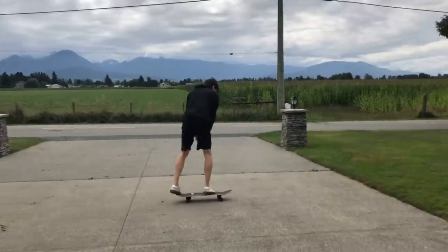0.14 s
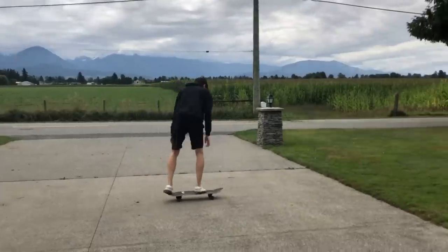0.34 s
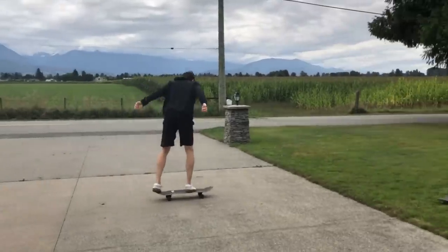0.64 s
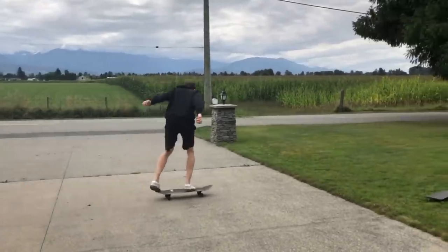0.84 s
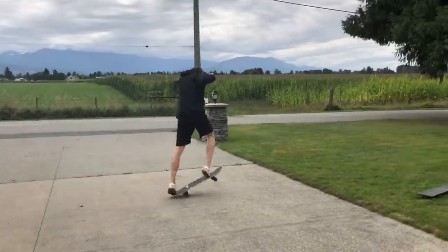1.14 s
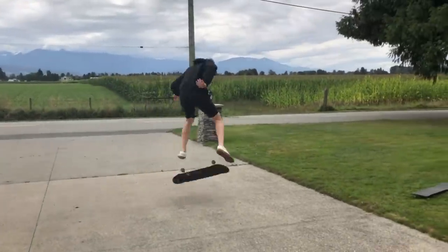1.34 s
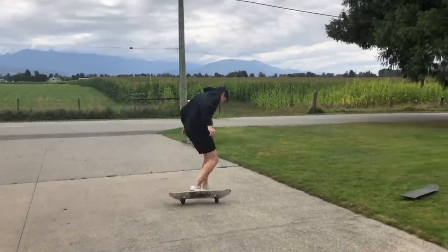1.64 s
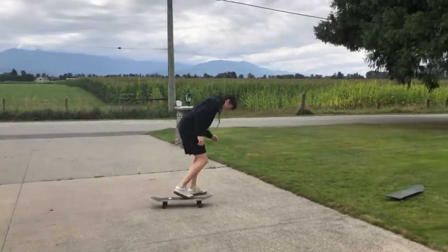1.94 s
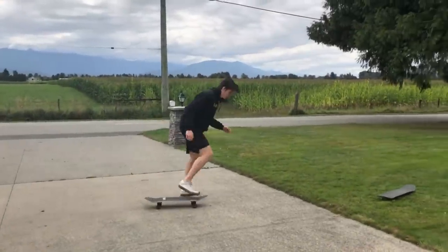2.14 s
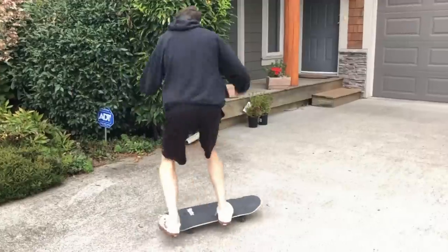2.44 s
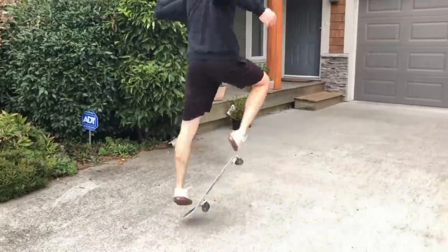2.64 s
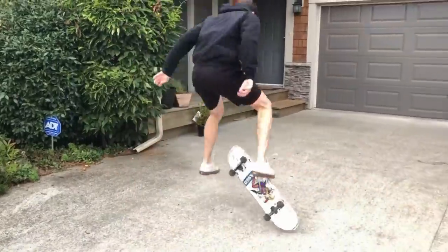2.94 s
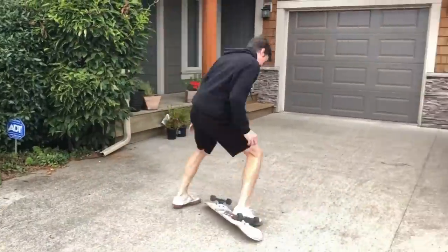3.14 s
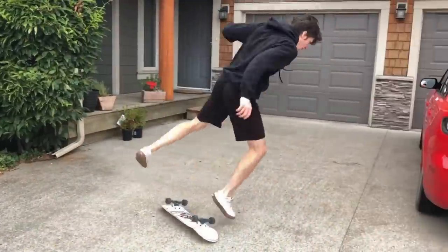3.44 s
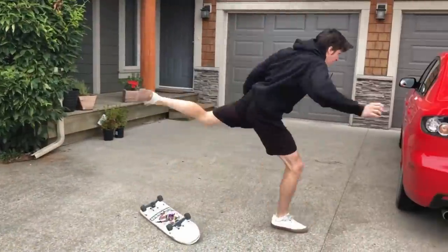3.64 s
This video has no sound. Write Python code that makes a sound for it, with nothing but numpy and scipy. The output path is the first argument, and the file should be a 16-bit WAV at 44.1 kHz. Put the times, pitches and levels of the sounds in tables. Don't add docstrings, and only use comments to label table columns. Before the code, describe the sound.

A distant skateboard hums quietly over gritty concrete with small stone ticks, pops at 1.2 s, and slams down in hard wooden clacks from 1.5 to 1.7 s, with a lighter knock near 1.95. At 2.3 s a closer, louder board rolls, pops sharply at 2.64, then crashes from 2.95 in rapid loud knocks with a short skid squeak at 3.13. Metal ticks and faint steps fade into quiet open air.

```python
import sys
import numpy as np
from scipy import signal
from scipy.fft import rfft, irfft
from scipy.io import wavfile

SR = 44100
rng = np.random.default_rng(int(sys.argv[2]) if len(sys.argv) > 2 else 0)


def wav_out(sig):
    wavfile.write(sys.argv[1], SR, np.round(np.clip(np.atleast_2d(sig).T, -1, 1) * 32767).astype(np.int16))


def ratio_of_db(decibels):
    return 10 ** (np.asarray(decibels, float) / 20)


N = 167580
TIME = np.arange(N) / SR


def rms_one(x):
    return x / np.sqrt(np.mean(x ** 2) + 1e-20)


def gains(rows):
    s, db, extra_db = np.transpose(rows)
    edge_s = 0.006
    inside = np.clip(np.minimum(TIME - s[0], s[-1] - TIME) / edge_s + 1, 0, 1)
    return inside * ratio_of_db(np.interp(TIME, s, db)), ratio_of_db(np.interp(TIME, s, extra_db))


def colour(x, points):
    hz, db = np.transpose(points)
    f = np.maximum(np.arange(N // 2 + 1) * SR / N, 1)
    octaves_below = np.maximum(np.log2(hz[0] / f), 0)
    octaves_above = np.maximum(np.log2(f / hz[-1]), 0)
    shape_db = np.interp(np.log(f), np.log(hz), db) - 18 * (octaves_below + octaves_above)
    return rms_one(irfft(rfft(x) * ratio_of_db(shape_db), N))


def ring(x, hz, t60):
    r, w = ratio_of_db(-60 / (t60 * SR)), 2 * np.pi * hz / SR
    return signal.lfilter([0, np.sin(w)], [1, -2 * r * np.cos(w), r * r], x + 1e-18)


def flutter(rate, depth_db):
    knots = rng.standard_normal(4000)
    return ratio_of_db(depth_db * np.interp(TIME * rate, np.arange(4000), knots))


def grains(per_s, spread_db):
    size = ratio_of_db(spread_db * np.minimum(rng.exponential(1, N), 4)) * rng.choice([-1, 1], N)
    return size * (rng.random(N) < per_s / SR)


# frequency in Hz, density in dB.
AIR_SPECTRUM = [(100, -8.5), (150, -7.5), (600, 0.5), (2300, -5), (2800, -18), (6000, -19.5), (12000, -27),
                (16000, -43)]
AIR_DB = -60.5
TRAFFIC_HZ, TRAFFIC_DB, TRAFFIC_ENDS_S = 91, -62.5, 3.25


def air():
    hiss = colour(rng.standard_normal(N), AIR_SPECTRUM) * flutter(7, 0.87)
    fade = np.clip((TRAFFIC_ENDS_S - TIME) / 0.17, 0.25, 1)
    road = ring(ring(rng.standard_normal(N), TRAFFIC_HZ, 0.061), TRAFFIC_HZ, 0.061)
    road = rms_one(road) * flutter(15, 1.6)
    return ratio_of_db(AIR_DB) * hiss + ratio_of_db(TRAFFIC_DB) * fade * road


YARD_DB, YARD_T60_S, YARD_GAP_S = -20, 0.27, 0.0067
YARD_BAND_HZ = [305, 2200]


def yard(x):
    t = np.arange(SR) / SR
    arrival = np.clip(t / YARD_GAP_S - 0.5, 0, 1)
    tail = rng.standard_normal(SR) * ratio_of_db(-60 * t / YARD_T60_S) * arrival
    tail = signal.sosfilt(signal.butter(1, YARD_BAND_HZ, "band", fs=SR, output="sos"), tail)
    tail = tail / np.sqrt(np.sum(tail ** 2))
    return ratio_of_db(YARD_DB) * signal.fftconvolve(x, tail)[:N]


# time in seconds, pitch in Hz, level in dB.
HUM_FAR = [(0, 622, -50.5), (.2, 650, -55.5), (.55, 640, -56), (.72, 600, -59), (.85, 615, -61.5),
           (.92, 670, -50.5), (1.012, 660, -47.5), (1.15, 680, -59)]
# time in seconds, pitch in Hz, level in dB.
HUM_AIRBORNE = [(2.76, 1201, -61), (2.84, 1150, -46.5), (2.93, 1193, -59)]
HUM_WIDTH_HZ = 22


def hum(rows, width_hz):
    s, hz, db = np.transpose(rows)
    phase = 2 * np.pi * np.cumsum(np.interp(TIME, s, hz)) / SR
    lowpass = signal.butter(1, width_hz, fs=SR, output="sos")
    a, b = signal.sosfilt(lowpass, rng.standard_normal((2, N)))
    level, _ = gains(np.c_[s, db, db])
    return level * rms_one(a * np.sin(phase) + b * np.cos(phase))


# frequency in Hz, density in dB.
GRIT_SPECTRUM = [(1760, -45.5), (3000, -2.5), (5250, -9), (6480, -4), (7150, -5), (14300, -11.5),
                 (16000, -15)]
# frequency in Hz, width in Hz, level in dB.
WHEELS = [(159, 154, 3), (290, 270, -2), (622, 144, -10.5), (1080, 210, -12), (2170, 250, -14)]
# frequency in Hz, width in Hz, level in dB.
NEAR_WHEELS = [(189, 29, 3.5), (390, 140, -0.5), (720, 830, -6), (1220, 640, -5.5), (2160, 1040, -14)]
# time in seconds, level in dB, grit over hum in dB.
ROLL_FAR = [(0, -52.5, -14.5), (.45, -51.5, -15.5), (.8, -58, -14.5), (.94, -56, -13.5),
            (1.02, -38.5, -18.5), (1.09, -48.5, -15.5), (1.215, -56, 1)]
# time in seconds, level in dB, grit over hum in dB.
ROLL_AWAY = [(1.75, -50, -10), (1.93, -60.5, -14), (2.1, -66.5, -4.5), (2.312, -43, -14.5)]
# time in seconds, level in dB, grit over hum in dB.
ROLL_NEAR = [(2.325, -37.5, -18), (2.4, -35, -14), (2.46, -29.5, -20.5), (2.56, -39, -13), (2.63, -44, -15)]
GRAINS_PER_S, GRAIN_SPREAD_DB = 3000, 3.5
PEBBLES_PER_S, PEBBLE_T60_S, PEBBLE_SPREAD_DB = 80, 0.014, 3.5


def rolling(curves, wheels, pebble_db, patchy_db):
    ground = grains(GRAINS_PER_S, GRAIN_SPREAD_DB)
    wheel_hum = 0
    for k, (hz, width_hz, db) in enumerate(wheels):
        resonance = rms_one(ring(ground, hz, 2.12 / width_hz))
        wheel_hum = wheel_hum + (-1) ** k * ratio_of_db(db) * np.sqrt(width_hz) * resonance * flutter(25.08, 1.8)
    wheel_hum = rms_one(wheel_hum)

    sand = colour(rng.standard_normal(N), GRIT_SPECTRUM)
    dull = signal.sosfilt(signal.butter(1, 6000, fs=SR, output="sos"), sand)
    fade = ratio_of_db(-60 / (PEBBLE_T60_S * SR))
    shared = np.abs(grains(PEBBLES_PER_S / 2, PEBBLE_SPREAD_DB))
    grit = 0
    for band in (dull, sand - dull):
        clicks = shared + np.abs(grains(PEBBLES_PER_S / 2, PEBBLE_SPREAD_DB))
        pebbles = signal.lfilter([1], [1, -fade], clicks)
        grit = grit + band * (flutter(31.15, patchy_db) + ratio_of_db(pebble_db) * pebbles)
    return sum(level * (wheel_hum + grit_gain * grit) for level, grit_gain in map(gains, curves))


# time in seconds, level in dB.
STONES = [(0.0596, -40), (0.1052, -41), (0.1196, -39.5), (0.1974, -53), (0.224, -37.5), (0.2387, -42),
          (0.2683, -50), (0.328, -39), (0.36, -40), (0.48, -39), (0.5307, -47), (0.6674, -43),
          (0.7534, -41), (0.7857, -43), (0.8076, -43), (0.8724, -39.5), (0.8832, -37.5), (0.9664, -38.5),
          (0.9976, -52), (1.096, -38), (1.1298, -40), (1.7944, -36), (1.8973, -38.5), (2.0915, -40.5),
          (2.174, -39), (2.392, -26), (2.446, -35), (2.4956, -27), (2.533, -29), (2.585, -25),
          (2.86, -37.5), (3.2427, -24)]
STONE_DB, STONE_T60_S, STONE_LOW_HZ = -4, 0.011, 4200


def stones():
    s, db = np.transpose(STONES)
    clicks = np.zeros(N)
    clicks[(s * SR).astype(int)] = ratio_of_db(db + STONE_DB)
    puffs = signal.lfilter([1], [1, -ratio_of_db(-60 / (STONE_T60_S * SR))], clicks + 1e-18)
    highpass = signal.butter(2, STONE_LOW_HZ, "high", fs=SR, output="sos")
    return puffs * signal.sosfilt(highpass, rng.standard_normal(N))


# start in seconds, length in seconds, from Hz, to Hz, level in dB.
SQUEAKS = [
    (1.143, .026, 4700, 2850, -41),
    (3.126, 0.017, 3040, 1800, -6),
    (1.172, .02, 4000, 4500, -51),
]


def squeaks():
    out = np.zeros(N)
    for s, length_s, from_hz, to_hz, db in SQUEAKS:
        u = np.clip((TIME - s) / length_s, 0, 1)
        loud = db > -20
        glide = u ** (6 if loud else 1)
        swell = 0.3 + u ** 2 if loud else 1
        hz = (from_hz + (to_hz - from_hz) * glide) * flutter(820, 0.156)
        shape = np.sin(np.pi * u ** 2.5) * swell * flutter(900, 2.5)
        out += ratio_of_db(db) * shape * np.sin(2 * np.pi * np.cumsum(hz) / SR)
    return out


# frequency in Hz, density in dB.
RUB_FAR = [(130, -2), (300, -3.5), (650, -5.5), (2200, -6.5), (3000, -21), (4000, -16.5)]
# frequency in Hz, density in dB.
RUB_NEAR = [(130, -16), (300, -11.5), (650, -6), (1100, -9.5), (1500, -10.5), (2300, -10), (3100, -18),
            (4000, -23)]
# time in seconds, level in dB, brightness in dB.
DRAG_FAR = [(1.225, -48.5, 7), (1.33, -45.5, -12.5), (1.37, -52, -15), (1.47, -71, -25)]
# time in seconds, level in dB, brightness in dB.
LANDING = [(1.499, -22.5, -5), (1.54, -39, -8), (1.619, -30, -3.5), (1.7, -31.5, -17),
           (1.761, -38.5, -23.5), (1.944, -62.5, -22), (1.969, -37, -5), (2.032, -55.5, -14)]
# time in seconds, level in dB, brightness in dB.
DRAG_NEAR = [(2.57, -52, -9), (2.63, -34.5, -1.5), (2.685, -27.5, -9.5), (2.765, -45.5, -6.5),
             (2.797, -39, -11), (2.808, -53.5, -8), (2.955, -48.5, -9.5)]
# time in seconds, level in dB, brightness in dB.
CRASH = [(2.962, -19.5, -13), (3.07, -21, -15.5), (3.129, -23, -15), (3.152, -34.5, -16.5),
         (3.176, -22, -22), (3.258, -42, -8), (3.371, -56.5, -15.5)]
# time in seconds, level in dB, brightness in dB.
STEP_OFF = [(3.381, -75, 15.5), (3.421, -54.5, -1), (3.531, -69.5, -7), (3.6, -61, -2), (3.732, -80, -11.5),
            (3.781, -52.5, -15.5)]
RUB_LUMPS_DB = 2.3


def rubbing(curves, spectrum):
    body = colour(grains(5000, 0.61), spectrum) * flutter(90, RUB_LUMPS_DB)
    hiss = colour(grains(15000, 6.4), GRIT_SPECTRUM) * flutter(80, RUB_LUMPS_DB)
    return sum(level * (body + bright * hiss) for level, bright in map(gains, curves))


# start in seconds,
# level in dB, pitch in Hz.
TICKS = [(3.378, -33, 3270), (3.394, -36, 3500), (3.412, -30.5, 2850), (3.485, -41.5, 2860),
         (3.496, -40.5, 2980), (3.574, -37.5, 2900), (.43, -45, 3600), (.447, -41.5, 2290),
         (0.604, -46, 3050), (0.619, -41.5, 3580), (0.641, -46.5, 4200), (.685, -49, 3200),
         (2.824, -40, 6000), (2.947, -29.5, 2700)]
TICK_T60_S = 0.024


def ticks():
    out, t = np.zeros(N + SR), np.arange(2000) / SR
    for s, db, hz in TICKS:
        click = rng.standard_normal(2000) * ratio_of_db(-60 * t / TICK_T60_S)
        tick = ring(click, hz, 0.0058) / 4 + 0.22 * np.diff(click, prepend=0)
        i = int(s * SR)
        out[i:i + 2000] += ratio_of_db(db) * tick / np.abs(tick).max()
    return out[:N]


# start in seconds, level in dB, pitch in Hz, t60 in seconds.
SLAPS = [(1.4958, -7, 640, 0.018), (1.6565, -4.5, 612, 0.02), (1.659, -11, 332, 0.069),
         (2.639, -11, 2260, 0.023), (2.64, -10.5, 1062, 0.036), (1.66, -15.5, 189, .07),
         (2.636, -18, 3510, 0.022), (1.69, -33.5, 79.6, 0.19), (2.99, -27, 72.8, 0.34),
         (2.672, -10.5, 2000, 0.033), (2.674, -19.5, 1080, 0.032), (2.9555, 1.5, 640, 0.014),
         (2.989, -16, 580, 0.022), (3.022, -7.5, 688, 0.021), (3.055, -9.5, 707, 0.024),
         (3.139, -18, 640, 0.031), (1.219, -30.5, 448, 0.076), (1.561, -22.5, 285, .06),
         (1.587, -19, 645, 0.044), (2.616, -25.5, 289, 0.073), (3.242, -36, 568, 0.055)]
SLAP_RISE_S, SLAP_SAG, SLAP_SAG_S = 0.00058, 0.46, 0.00093


def slaps():
    out, t = np.zeros(N + SR), np.arange(SR // 5) / SR
    bent_t = t + SLAP_SAG * SLAP_SAG_S * (1 - np.exp(-t / SLAP_SAG_S))
    for s, db, hz, t60 in SLAPS:
        shape = (1 - np.exp(-t / SLAP_RISE_S)) ** 2 * ratio_of_db(-60 * t / t60)
        i = int(s * SR)
        out[i:i + len(t)] += ratio_of_db(db) * shape / shape.max() * np.sin(2 * np.pi * hz * bent_t)
    return out[:N]


# frequency in Hz, level in dB, t60 in seconds.
DECK = [(332, -10, 0.076), (415, -11.5, 0.13), (621, -1, 0.025), (693, 5, 0.023), (904, -3, 0.037),
        (1057, 2.5, 0.035), (1387, -3, 0.046), (1583, -3.5, 0.045), (1911, -0.5, 0.038), (2236, 1.5, 0.037),
        (2623, -3.5, 0.033), (3200, -2, 0.023), (4084, -2, 0.02)]
# time in seconds, then knock, clack, crack and thump in dB.
BLOWS = [(1.218, -21, -18.5, -23, -66), (1.4965, -5, -19.5, -16, -26), (1.55, -15.5, -20.5, -25.5, -30),
         (1.56, -14, -21, -27, -17.5), (1.587, -12, -16, -21.5, -15.5), (1.621, -15, -49, -25, -9),
         (1.6555, -12, -10, -2, -4.5), (1.696, -18.5, -22.5, -23, -7), (1.961, -22.5, -28.5, -23, -21),
         (2.64, -14.5, -8, -14.5, -21.5), (2.673, -18.5, -12.5, -22.5, -44), (2.9555, -6, -10.5, -9.5, -39),
         (2.988, -2, -17.5, -13, -6.5), (3.003, -18.5, -21, -25.5, -41), (3.022, -4.5, -12, -11, -44.5),
         (3.039, -6, -34, -28.5, -27), (3.055, -9, -13, -17.5, -13), (3.072, -43, -16.5, -38, -12.5),
         (3.138, -21, -14, -29, -28), (3.167, -24, -15.5, -17.5, -51), (3.65, -33.5, -42.5, -53, -32)]
# time in seconds, then knock, clack and crack in dB.
TAPS = [(0.464, -44, -46.5, -38), (1.166, -51, -40, -32), (1.421, -54, -49, -50), (2.135, -63, -50, -39.5),
        (2.156, -68.5, -49.5, -51), (2.193, -76, -47, -43), (2.219, -31, -38.5, -30.5),
        (2.276, -28.5, -34.5, -60), (2.32, -28, -46, -40), (2.612, -50, -27, -48), (2.783, -51, -40, -50)]
# time in seconds, then knock, clack and crack in dB.
FIRST_TOUCH = (2.946, -26, -40, -60)
TAP_THUMP_DB = -16.5
CONTACT_S, DAMPED_SHARE, RING_DB, MODE_SPREAD_DB = 0.001, 0.32, -7.5, 2.5
CRACK_RISE_S, CRACK_T60_S, CRACK_TAIL_DB, CRACK_TAIL_T60_S = 0.002, 0.012, -28.5, 0.11
THUMP_HZ, THUMP_T60_S, THUMP_LAG_S = 259, 0.027, 0.0056


def strikes(rows):
    out, size = np.zeros(N + SR), SR // 5
    t = np.arange(size) / SR
    hz, level_db, t60 = np.transpose(DECK)[:, :, None]
    held = ratio_of_db(-60 * t / (DAMPED_SHARE * t60))
    free = ratio_of_db(RING_DB - 60 * t / t60)
    mode_shape = (held + free) * (1 - np.exp(-t / CONTACT_S)) ** 2
    crack_decay = ratio_of_db(-60 * t / CRACK_T60_S) + ratio_of_db(CRACK_TAIL_DB - 60 * t / CRACK_TAIL_T60_S)
    crack_shape = np.clip(t / CRACK_RISE_S - 0.5, 0, 1) * crack_decay
    thump_shape = (1 - np.exp(-t / THUMP_LAG_S)) ** 2 * ratio_of_db(-60 * t / THUMP_T60_S)
    high = signal.butter(2, [2800, 13500], "band", fs=SR, output="sos")
    for s, knock_db, clack_db, crack_db, thump_db in rows:
        share, detune, phase = rng.standard_normal((3, len(DECK), 1))
        turn = 2 * np.pi * hz * (1 + 0.03 * detune) * t + 3 * phase * (hz > 1000)
        modes = ratio_of_db(level_db + MODE_SPREAD_DB * share) * mode_shape * np.sin(turn)
        knock = modes[:5].sum(axis=0)
        clack = modes[5:].sum(axis=0)
        crack = signal.sosfilt(high, rng.standard_normal(size)) * crack_shape
        thump = np.sin(2 * np.pi * THUMP_HZ * (1 + share[0] / 20) * t) * thump_shape
        hit = ratio_of_db(knock_db - 2.5) * knock / np.abs(knock).max()
        hit += ratio_of_db(clack_db + 5.5) * clack / np.abs(clack).max()
        hit += ratio_of_db(crack_db + 10.0) * crack + ratio_of_db(thump_db + 7) * thump
        i = int((s - 0.0008) * SR)
        out[i:i + size] += hit
    return out[:N]


def scene():
    wheels = rolling([ROLL_FAR, ROLL_AWAY], WHEELS, pebble_db=2, patchy_db=3)
    wheels += rolling([ROLL_NEAR], NEAR_WHEELS, pebble_db=1, patchy_db=2.5)
    wheels += hum(HUM_FAR, HUM_WIDTH_HZ) + hum(HUM_AIRBORNE, 3 * HUM_WIDTH_HZ)
    rub = rubbing([DRAG_FAR, LANDING], RUB_FAR) + rubbing([DRAG_NEAR, CRASH, STEP_OFF], RUB_NEAR)
    taps = [(*row, row[1] + TAP_THUMP_DB) for row in [*TAPS, FIRST_TOUCH]]
    board = ticks() + slaps() + strikes(BLOWS) + strikes(taps)
    mix = air() + yard(board) + wheels + stones() + squeaks() + rub + board
    return mix[None]


def band_limit(x):
    return signal.sosfilt(signal.butter(12, 16530, fs=SR, output="sos"), x)


MIC_LOW_HZ, MIC_TOP_HZ, PEAK_LIMIT = 60, 16300, 1.3


def record(dry):
    x = signal.sosfilt(signal.butter(3, MIC_LOW_HZ, "high", fs=SR, output="sos"), dry)
    rounded = PEAK_LIMIT * np.tanh(x / PEAK_LIMIT)
    mix = signal.sosfilt(signal.cheby2(16, 60, MIC_TOP_HZ, fs=SR, output="sos"), rounded)
    return band_limit(mix)


dry = scene()
out = record(dry)
wav_out(out)
```